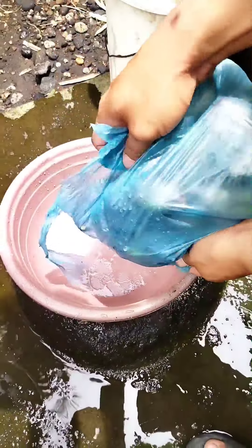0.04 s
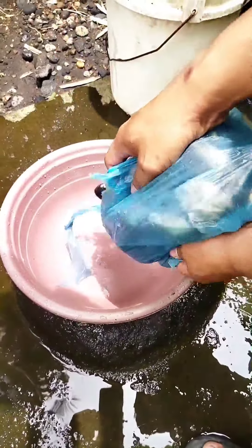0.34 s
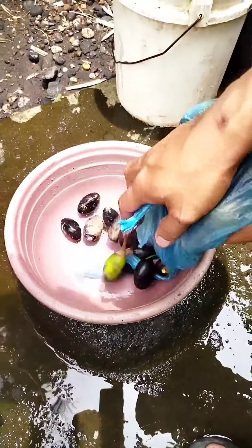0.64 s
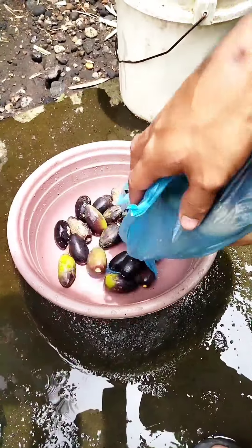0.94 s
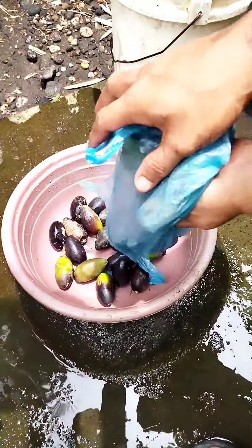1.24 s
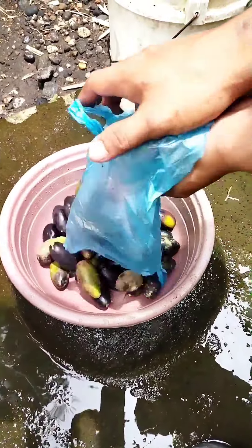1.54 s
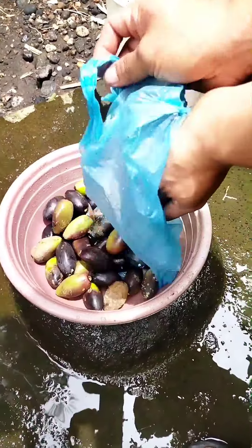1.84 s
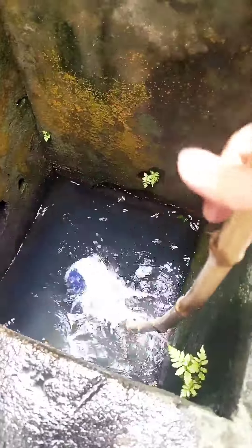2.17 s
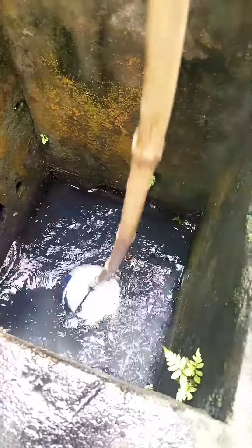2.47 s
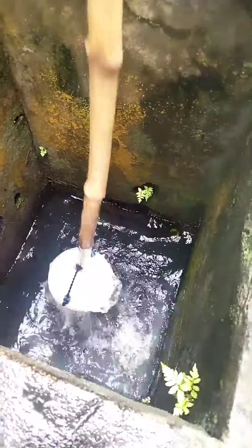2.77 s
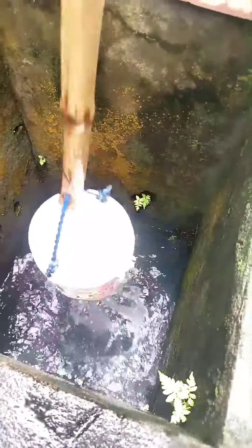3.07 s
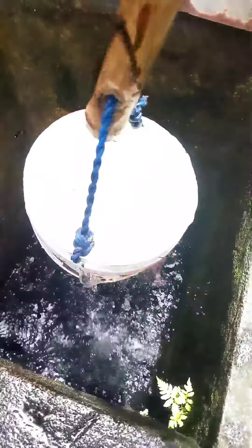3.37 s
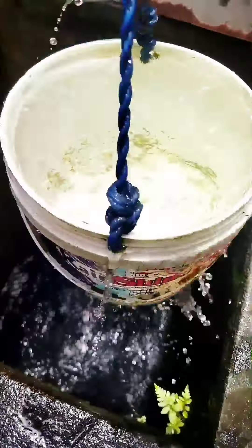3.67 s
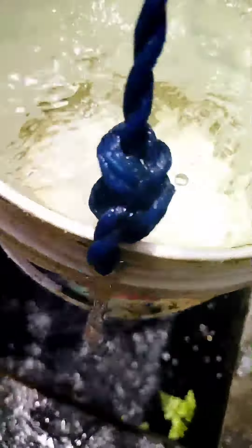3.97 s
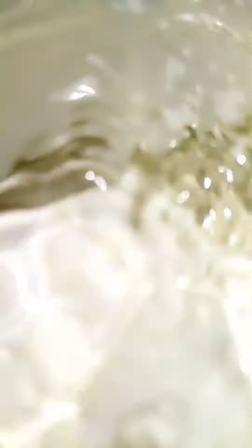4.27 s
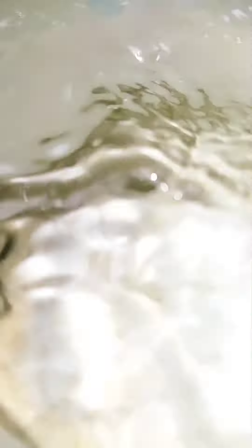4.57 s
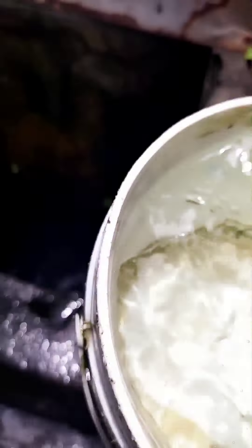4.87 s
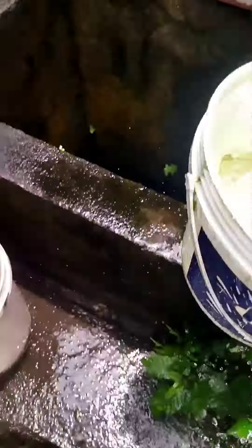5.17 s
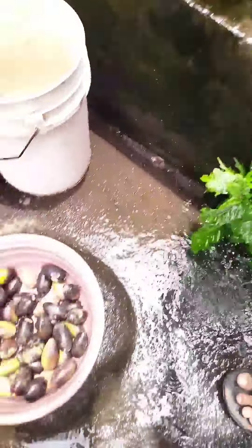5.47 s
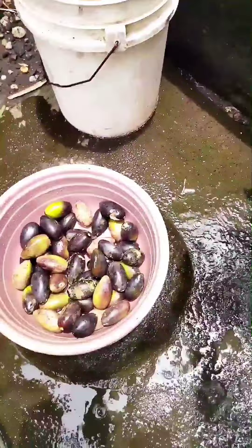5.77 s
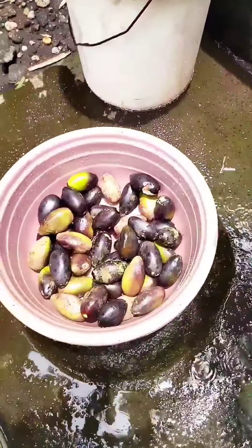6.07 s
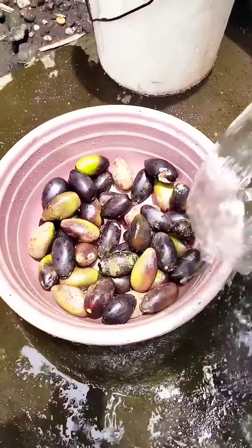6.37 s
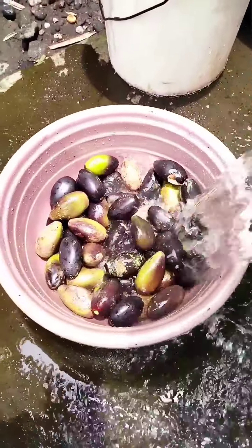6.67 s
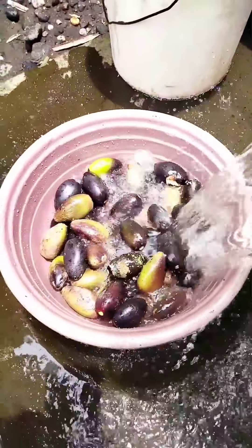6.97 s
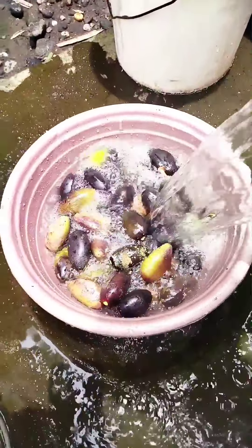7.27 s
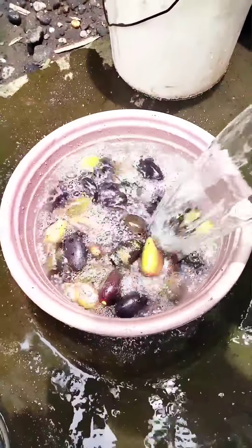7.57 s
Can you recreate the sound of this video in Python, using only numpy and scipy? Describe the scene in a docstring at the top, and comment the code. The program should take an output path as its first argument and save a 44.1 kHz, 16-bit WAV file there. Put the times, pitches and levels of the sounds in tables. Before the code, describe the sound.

A wet plastic bag crinkles as small hard fruits tumble into a hollow plastic basin in two rushes. A bucket knocks and dunks in a shallow well, then rises with water spilling and bubbling back into the shaft. Water sloshes, a wire handle clicks and sandals scuff on wet concrete. Two slops lead into a stream pouring on the fruit. Everything is close, over faint outdoor air and a low rumble.

```python
"""A wet plastic bag crinkles, and small hard fruits tumble from it in two rushes, ringing a plastic basin.
A bucket on a bamboo pole knocks, is dunked in a shallow well and rises, spilling bubbles and drops
back into the hollow shaft. It is carried over: the wire handle clicks, the water sloshes, sandals scuff
on wet concrete. Two slops, then a stream pours on the fruit. Yard air and a low rumble lie underneath."""
import sys
import numpy as np
from scipy import signal
from scipy.fft import rfft, irfft, next_fast_len
from scipy.io import wavfile
from scipy.ndimage import uniform_filter1d

SR = 44100
rng = np.random.default_rng(int(sys.argv[2]) if len(sys.argv) > 2 else 0)


def waveform_to_disk(signal):
    """Save audio, clipped to [-1, 1], as 16-bit WAV at the path in sys.argv[1]."""
    frames = np.transpose(np.atleast_2d(signal))
    scaled = np.clip(frames, -1, 1) * 32767
    samples = np.round(scaled).astype(np.int16)
    wavfile.write(sys.argv[1], SR, samples)


N = 335733

# Table levels are faders ahead of each layer's own gain.
# the bag sliding and crumpling: (time [s], level [dB])
BAG_ENVELOPE = [(0.0, -33), (0.026, -33.5), (0.262, -28.5), (0.29, -33), (0.394, -28), (0.504, -37),
                (0.58, -29), (0.91, -38), (0.938, -45), (1.086, -37), (1.108, -42.5), (1.54, -32),
                (1.92, -41), (1.97, -37.5)]
# tone of the crinkle: (frequency [Hz], level [dB])
BAG_TONE = [(100,-10),(250,2),(1400,1.5),(2000,3),(2450,-3.5),(3200,2.5),(5500,-2),(6700,1),(7500,-5),(9300,8),(10800,-1),(12000,4.5),(15500,5.5)]
# tone of the outdoor air: (frequency [Hz], level [dB])
AIR_TONE = [(25,-29),(70,0),(170,-7),(420,4),(800,-4),(1500,-3.5),(3500,-4.5),(7500,-8.5),(9500,-2),(11000,-11),(12500,1),(15500,-14)]
# slow drift of the low rumble: (time [s], level [dB])
RUMBLE_ENVELOPE = [(0,-41.5),(1.4,-49),(2.3,-48.5),(3.4,-45.5),(5,-49),(7.61,-46.5)]
# tone of the rumble: (frequency [Hz], level [dB])
RUMBLE_TONE = [(25,-81),(60,-6.5),(110,0),(170,0),(240,-1),(400,-23),(1500,-64)]
# featured fruit hits on the basin: (time [s], body [dB], crack [dB], thud [dB])
FRUIT_HITS = [(0.678,-4.5,-8.5,-9),(0.728,-6,-10.5,-13),(0.748,-3,-19,-15),(0.762,-5,-28,-16),(0.779,-8.5,-32,-28),(0.812,-4,-11.5,-26),(0.829,-4.5,-9,-24),(0.854,-4.5,-7,-20),(0.864,-8,-9,-28),(0.874,-6,-15,-28),
              (0.898,-8,-6.5,-25),(0.91,-4.5,-8,-23),(0.93,-4,-19,-27),(0.946,-7.5,-17,-24),(0.961,-13,-20.5,-32),(0.973,-3,-18,-25),(1.005,-4.5,-17,-22),(1.025,-2.5,-18,-20),(1.044,-2,-16,-23),
              (1.068,-4.5,-13,-24),(1.083,-13,-32,-29),(1.11,-13.5,-24,-36),(1.135,-12,-19,-31),(1.148,-6,-15.5,-25),(1.164,-13,-15.5,-31),(1.221,-13.5,-49,-38),(1.25,-18,-37,-38),(1.341,-20.5,-50,-38),(1.396,-16.5,-45,-33),(1.45,-15.5,-20.5,-28),
              (1.584,-10.5,-25,-27),(1.594,-4,-24,-27),(1.607,-3.5,-17,-26),(1.636,-4,-8.5,-23),(1.659,-3,-15,-26),(1.679,-6.5,-29,-21),(1.699,-14,-31,-25),(1.718,-12,-37,-28),(1.731,-3,-22,-25),(1.755,-3.5,-6.5,-16),(1.766,-8,-13,-22),(1.782,-5,-12.5,-20),
              (1.814,-3.5,-6,-21),(1.835,-11,-12,-21),(1.851,-16,-26,-24),(1.868,-7,-11.5,-26),(1.886,-9,-30,-30),(1.92,-10,-14,-31),(1.948,-23,-18.5,-36)]
# the two rushes, filled in with softer jostles: (start [s], end [s])
FRUIT_RUSHES = [(0.738, 1.12), (1.59, 1.9)]
# modes of the basin: (frequency [Hz], level when empty [dB], t60 [s], change when full [dB])
BASIN_MODES = [(209,-12,0.13,1),(258,-6.5,0.12,-0.5),(331,-6.5,0.11,1),(373.5,-4,0.1,2.5),(433.3,2,0.12,-2.5),(469,6,0.093,-3.5),(505,2,0.069,-1.5),(614,-1.5,0.059,0.5),(692,-5,0.11,2.5),(746,-6,0.12,-5),(804,-3,0.064,3.5),(882,2,0.038,0.5),(953,-11,0.056,4),(1290,-18,0.074,0),(1389,-5,0.057,-0.5),(1788,-8.5,0.057,4.5),(2150,-17,0.12,-5),(2660,-18,0.09,0)]
# air resonances of the basin's hollow: (frequency [Hz], gain [dB], t60 [s])
BASIN_AIR = [(261,-6,0.12),(467,-15,0.07),(596,-5,0.08)]
# tone of a hit's contact crack: (frequency [Hz], level [dB])
CRACK_TONE = [(500,8.5),(1000,13.5),(1400,14),(2500,7),(3500,3),(4500,-4),(5500,-13.5),(9000,-25),(16000,-14)]
# tone of a hit's low thud: (frequency [Hz], level [dB])
THUD_TONE = [(20,-28),(60,-9),(120,-8),(190,9.5),(260,1.5),(500,-52),(2000,-63)]
# bucket knocks, shorter when it is held: (time [s], body [dB], crack [dB], thud [dB], ring time [ratio])
BUCKET_KNOCKS = [(1.979,-29.5,-16,-11,0.35),(2.031,-15,-13.5,-16,0.47),(2.04,-19,-19,-17.5,0.62),(2.061,-25.5,-40,-38,1.1),(2.166,-32,-33,-35,0.47),(2.173,-19.5,-18.5,-24,1.35),(2.25,-19.5,-15,-20,0.72),(4.304,-30,-28,-30,0.34),
                 (4.493,-18.5,-11.5,-18,0.13),(4.511,-18,-33,-28,0.22),(4.6,-38,-42,-34,0.4),(4.652,-28,-33,-30,0.26)]
# modes of the full bucket: (frequency [Hz], level [dB], t60 [s])
BUCKET_MODES = [(232,-8,0.033),(269,6.5,0.17),(351,8,0.19),(392,10.5,0.06),(560,-4,0.012),(589,15,0.075),(830,-5,0.036),(1070,-6,0.016)]
# featured bubbles and air pockets: (time [s], level [dB], pitch [Hz], t60 [cycles])
AIR_POCKETS = [(1.979,-13,145,4.7),(2.031,-13,200,12),(2.06,-27,268,59),(2.17,-8.5,392,22),(2.6,-27,3560,190),(2.607,-28,4580,260),(2.64,-28,956,50),(2.705,-29,2030,150),(2.767,-20,894,120),(2.767,-15,1600,45),(2.767,-19,1900,70),(2.905,-24,2360,74),(2.933,-26,2750,100),
               (3.068,-25,900,61),(3.15,-21,1270,61),(3.218,-19.5,1570,150),(3.241,-13.5,336,51),(3.425,-24,335,66),(3.477,-20,279,31),(3.569,-21.5,225,25),(3.602,-23,2800,98),(4.075,-24.5,352,24),(4.255,-25,2862,110),(4.41,-25.5,1776,54),
               (4.5,-20,237,12),(4.511,-16.5,583,12),(4.597,-33.5,405,11),(4.651,-30,523,8.7),(4.71,-32,1120,40),(4.748,-38,1260,45),(4.786,-33.5,596,20),(6.40,-26.5,578,14),(6.508,-16.5,2220,36),(6.57,-25,1530,89),(6.68,-22,432,13),(6.77,-20,541,26),(7.407,-25,990,84),(7.512,-29,2020,99)]
# featured water slaps: (time [s], body [dB], centre [Hz], treble [dB], t60 [s])
WATER_SLAPS = [(1.983,-18,1580,-22.5,0.067),(2.172,-24,1390,-34,0.12),(2.221,-24,2600,-24,0.06),(2.35,-35.5,4050,-30.5,0.28),(2.501,-28.5,1970,-37,0.058),(2.765,-15.5,1330,-46,0.043),(2.845,-18,796,-51,0.039),(2.902,-31,2090,-50,0.083),
               (3.068,-18,1050,-30,0.1),(3.223,-25,1600,-37,0.15),(3.475,-20,1220,-42,0.14),(3.566,-31,900,-38,0.1),(3.755,-40,3000,-31.5,0.09),(3.812,-49,2500,-29,0.088),(3.9005,-26.5,2700,-19.5,0.012),(3.914,-26.5,1980,-25,0.096),(3.95,-25,1710,-24,0.39),(4.05,-23,1520,-29,0.065),(4.145,-34,1210,-26,0.009),(4.225,-37,1900,-29.5,0.17),(4.254,-25,2440,-36,0.05),(4.305,-44,1600,-33,0.083),(4.408,-27,1850,-31.5,0.049),
               (4.655,-34.5,1580,-34,0.12),(4.71,-34,1700,-35,0.04),(4.871,-34,1610,-35.5,0.04),(6.448,-44,4400,-20.5,0.0054),(6.5075,-16.5,3150,-16.5,0.0064),(6.5605,-26,4300,-17.5,0.0033),(6.568,-17.5,1580,-22,0.018),
               (6.62,-25,2980,-26,0.059),(6.859,-18,3400,-32,0.011),(7.029,-17.5,4500,-31,0.018),(7.133,-23,3900,-32,0.012),(7.33,-24,2400,-34,0.02)]
# the bucket pushed under twice: (start [s], length [s], level [dB])
BUCKET_DUNKS = [(1.991,.05,-27),(2.221,0.055,-26)]
# water spilling off the bucket into the well: (time [s], level [dB])
SPILL_ENVELOPE = [(2.42,-52),(2.5,-32.5),(2.63,-32),(2.69,-33),(2.8,-29),(3.0,-24),(3.2,-24),(3.56,-22),(3.63,-30),(3.73,-36),(4.12,-33),(4.32,-32.5),(4.45,-36),(4.57,-44),(4.71,-40.5),(5.08,-55.5)]
# tone of the spill and the slosh: (frequency [Hz], level [dB])
SPILL_TONE = [(120,-17.5),(330,-5),(470,-6.5),(600,-2),(950,2),(1600,-1.5),(2600,-1),(4500,1),(5200,-4.5),(6700,-2),(7500,-9.5),(9200,4),(11000,-8),(11900,0.5),(15500,-1)]
# the spray comes forward as the bucket rises to the rim: (time [s], spray boost [dB])
LIFT_SPRAY = [(3.2,-4),(3.8,3)]
# air resonances of the well shaft: (frequency [Hz], gain [dB], t60 [s])
SHAFT_AIR = [(176.7,12,0.23),(266,2,0.14),(344,4,0.24),(610,-7,0.028),(880,-9,0.14)]
# clicks of the wire handle: (time [s], clack [dB], bright tick [dB])
HANDLE_CLICKS = [(4.494,-16,-23),(5.14,-27,-24.5),(5.194,-44,-35),(5.477,-46,-31),(5.596,-44,-37),(5.617,-44,-37),(5.631,-49,-30),(5.65,-56,-26.5),(5.698,-44,-30),(5.787,-32,-19),(5.805,-21,-42),(5.812,-12.5,-23),(5.8453,-28,-18.5),(5.857,-43,-23.5),(5.93,-17,-18),(6.017,-27.5,-35),(6.248,-44,-26),(6.268,-35,-28.5),(6.395,-28.5,-38)]
# sandals dragged on wet concrete: (start [s], length [s], level [dB], tilt [dB/octave])
SANDAL_SCUFFS = [(5.141,0.064,-31.5,3.5),(5.247,0.061,-36.5,0.5),(5.484,0.037,-38.5,1),(5.581,0.055,-41.5,0),(5.692,0.031,-26,9),(5.868,0.045,-32,6),(6.067,0.135,-26.5,0.86)]
# tone of a scuff before its tilt: (frequency [Hz], level [dB])
SCUFF_TONE = [(200,-8),(800,-5),(1500,-2),(1920,1.5),(2250,-4),(4100,-4.5),(4800,-12),(5250,-7.5),(7400,-15),(9200,-8.5),(11000,-18),(12200,-9.5),(15500,-13)]
# slops over the rim, ahead of the stream: (start [s], length [s], spray [dB])
RIM_SLOPS = [(6.457,.045,-20),(6.571,0.12,-21)]
# tone of water landing on the fruit: (frequency [Hz], level [dB])
POUR_TONE = [(150,-14),(350,-11),(600,-1),(800,-0.5),(1200,-4.5),(2400,3),(3400,5),(4600,1.5),(5100,1),(6700,3),(7400,-3.5),(9200,8.5),(11000,-3),(11900,4.5),(15500,3.5)]
# reverb of the concrete walls: (frequency [Hz], t60 [s])
WALL_DECAY = [(150,0.23),(600,0.13),(3000,0.24),(15000,0.0073)]
# drift across the stereo image: (time [s], left minus right [dB])
PAN_DRIFT = [(0,1),(.7,-1),(3.7,0.5),(4.8,-2.5),(7.61,0)]
# imbalance of the two microphones: (frequency [Hz], left minus right [dB])
MIC_BALANCE = [(100,0.23),(380,2.6),(800,0.14),(2400,2),(4400,3.2),(7000,3.5),(8200,7.5),(9200,19),(10200,9.8),(11200,1.3),(15000,3.7)]
# how alike diffuse sound is on both sides: (frequency [Hz], correlation [ratio])
MIC_COHERENCE = [(60,0.98),(300,0.85),(700,0.81),(1400,0.15),(3000,0.21),(15000,0.02)]
# bright edge of a slap or click: (frequency [Hz], level [dB])
EDGE_TONE = [(2000, -46), (4500, 6.5), (7500, 2.5), (9300, 10), (11000, 2.5), (12500, 12.5),
             (14000, 6.5), (15500, 7.5)]


def amp(db):
    """Decibels to gain."""
    return 10 ** (np.asarray(db) / 20)


def decay(t, t60):
    """An exponential fade, 60 dB down at t60."""
    return np.exp(-np.log(1000) * t / t60)


def unit_rms(x):
    """Scales to rms 1."""
    return x / np.sqrt(np.mean(x ** 2) + 1e-20)


def unit_hit(x):
    """Scales a hit so that its loudest 5 ms have rms 1 in mono."""
    return x / np.sqrt(uniform_filter1d(x.mean(0) ** 2, 220).max() + 1e-20)


def at_hz(points, hz):
    """Reads a curve on a log-frequency axis."""
    knots, values = np.transpose(points)
    return np.interp(np.log(hz + 1), np.log(knots + 1), values)


def bins(x):
    """Frequencies of the spectrum of x."""
    return np.fft.rfftfreq(x.shape[-1], 1 / SR)


def eq(x, tone):
    """Filters by a tone curve."""
    return irfft(rfft(x) * amp(at_hz(tone, bins(x))), x.shape[-1])


def add(mix, s, sound):
    """Mixes a stereo sound in at a time."""
    part = mix[:, max(round(s * SR), 0):][:, :sound.shape[1]]
    part += sound[:, :part.shape[1]]


def envelopes(rows):
    """Start time and one gain curve per level column, with softened ends."""
    s, *columns = np.transpose(rows)
    t = s[0] + np.arange(next_fast_len(int((s[-1] - s[0]) * SR))) / SR
    ends = np.clip(np.minimum(t - s[0], s[-1] + .01 - t) / .005, 0, 1)
    return s[0], [amp(np.interp(t, s, db)) * ends for db in columns]


def stroke(start, length, db, attack_s, swell_db, release_s):
    """One gesture as (time [s], level [dB]): it sets in, swells or sinks, and lets go."""
    end = start + length
    return [(start - attack_s, db - 30), (start, db - swell_db), (end, db), (end + release_s, db - 30)]


def wander(size, span_s):
    """A smooth random curve of rms 1 that changes over about this time."""
    width = int(span_s * SR)
    return unit_rms(uniform_filter1d(uniform_filter1d(rng.standard_normal(size), width), width // 2))


def noise(size):
    """Stereo white noise, centred in the bass and wide on top."""
    white = rng.standard_normal((2, size))
    mid, side = rfft(white)
    same = np.clip(at_hz(MIC_COHERENCE, bins(white)), -1, 1)
    mid, side = mid * np.sqrt(1 + same), side * np.sqrt(1 - same)
    return unit_rms(irfft([mid + side, mid - side], size))


def grains(size, per_s, cycles, spread_db, low_hz, high_hz, count):
    """A cloud of tiny damped rings; the small high ones come most often."""
    pitches, out = np.geomspace(low_hz, high_hz, count), np.zeros((2, size))
    for hz in pitches * rng.uniform(.95, 1.05, count):
        life = cycles / hz
        lag = rng.uniform(0, 0.0005, (2, 1))  # path to each microphone
        t = np.maximum(np.arange(int(life * SR) + 40) / SR - lag, 0)
        ring = np.sin(2 * np.pi * hz * t) * decay(t, life)
        born = rng.random(size) < per_s * hz / pitches.sum() / SR
        sizes = amp(spread_db * np.minimum(rng.exponential(1, size), 4))
        out += signal.oaconvolve((born * sizes)[None], ring / np.linalg.norm(ring), axes=1)[:, :size]
    return unit_rms(out)


def friction(rows, tone, level_db, slips_per_s, spread_db, hiss_db):
    """Dense tiny slips merge into a grainy hiss that follows the gesture."""
    s, (gesture,) = envelopes(rows)
    size, out = len(gesture), np.zeros((2, N))
    slips = grains(size, slips_per_s, cycles=2.4, spread_db=spread_db, low_hz=950, high_hz=14800, count=12)
    texture = unit_rms(eq(slips + amp(hiss_db) * noise(size), tone))
    add(out, s, amp(level_db) * gesture * texture)
    return out


def plastic_bag(flutter_db=1.4):
    """Wet film slides and crumples in tiny slips, with a quick flutter in level."""
    crinkle = friction(BAG_ENVELOPE, BAG_TONE, level_db=7.5, slips_per_s=5000, spread_db=4, hiss_db=-4)
    return crinkle * amp(flutter_db * wander(N, span_s=0.014))


def yard(air_db=-42):
    """The bed: steady outdoor air and a low hollow rumble."""
    size = next_fast_len(N)
    air, rumble = (unit_rms(eq(noise(size), tone))[:, :N] for tone in (AIR_TONE, RUMBLE_TONE))
    rumble_db = np.interp(np.arange(N) / SR, *np.transpose(RUMBLE_ENVELOPE))
    return amp(air_db) * air + amp(rumble_db) * rumble


def burst(tone, rise_s, t60, tick=0, size=12000):
    """A puff of shaped noise, quick to swell and die; a hard contact adds one tick."""
    t, drive = np.arange(size) / SR, noise(size)
    drive[:, 60] += tick
    return unit_hit(eq(drive, tone) * (1 - np.exp(-t / rise_s)) * decay(t, t60))


def plastic_hits(rows, modes_at, body_db, crack_db, thud_db, thud_t60, crack_t60=0.075):
    """Each hit rings a plastic wall, with a crack and a thud; its ring ratio scales all three decays."""
    out, t = np.zeros((2, N)), np.arange(7200) / SR
    contact_s, spot_db, detune_spread = 0.0018, 2.8, 0.052
    attack = 1 - np.exp(-t / contact_s)
    for s, body, crack, thud, ring_ratio in rows:
        hz, db, t60 = np.transpose(modes_at(s))[:, :, None]
        # the landing spot weights the modes and the shifting load detunes them
        spot, detune, turn, lag = rng.standard_normal((4, len(hz), 1))
        phase = 2 * np.pi * hz * (1 + detune_spread * detune) * t + turn
        strength = amp(db + spot_db * spot) * decay(t, ring_ratio * t60) * attack
        ring = np.array([(strength * np.sin(phase + side * lag * hz / 2500)).sum(0) for side in (-1, 1)])
        add(out, s, amp(body + body_db) * unit_hit(ring))
        add(out, s, amp(crack + crack_db) * burst(CRACK_TONE, 0.000093, ring_ratio * crack_t60, tick=2.4))
        add(out, s, amp(thud + thud_db) * burst(THUD_TONE, 0.0049, ring_ratio * thud_t60))
    return out


def landings(per_rush=6, spread_db=3.5):
    """The featured fruit hits, plus soft jostles scattered through each rush."""
    jostles = []
    for start, end in FRUIT_RUSHES:
        place, force_db = rng.random(per_rush), spread_db * rng.standard_normal(per_rush)
        s = start + (end - start) * (np.arange(per_rush) + place) / per_rush
        jostles.append(np.column_stack([s, force_db - 13, force_db - 22, force_db - 33]))
    return np.vstack([FRUIT_HITS, *jostles])


def rebounds(rows, loss_db=8):
    """Each fruit settles with a second, softer and duller bump."""
    s, body, crack, thud = np.transpose(rows)
    hop_s = rng.uniform(0.00597, .02, len(s))
    return np.column_stack([s + hop_s, body - loss_db, crack - 2 * loss_db, thud - loss_db])


def basin_modes(s, full_s=2, full_ring=0.86):
    """The growing pile damps the basin's floor, so its walls are heard more."""
    load = np.interp(s, [FRUIT_HITS[0][0], full_s], [0, 1])
    return [(hz, db + load * full_db, t60 * full_ring ** load) for hz, db, t60, full_db in BASIN_MODES]


def hollow(x, resonances):
    """An enclosed body of air adds its resonances to the sound inside it."""
    t = np.arange(16384) / SR
    hz, db, t60 = np.transpose(resonances)[:, :, None]
    fade = decay(t, t60)
    ring = (2 * amp(db) * fade / fade.sum(1, keepdims=True) * np.cos(2 * np.pi * hz * t)).sum(0)
    return x + signal.oaconvolve(x, ring[None], axes=1)[:, :N]


def tumbling_fruit(ring_ratio=0.79):
    """Fruits land and bounce in the hollow basin, each one shortening the ring it starts."""
    falls = landings()
    bumps = [(*row, ring_ratio) for row in np.vstack([falls, rebounds(falls)])]
    hits = plastic_hits(bumps, basin_modes, body_db=-2, crack_db=-2.5, thud_db=-5, thud_t60=0.04)
    return hollow(hits, BASIN_AIR)


def bucket_knocks():
    """Knocks ring the low modes of the full bucket."""
    return plastic_hits(BUCKET_KNOCKS, lambda s: BUCKET_MODES,
                        body_db=1, crack_db=0.5, thud_db=0.5, thud_t60=0.1)


def gulps(rise_s=0.0049, glide=0.32):
    """Single pockets of trapped air ring out and climb a little in pitch."""
    out, t = np.zeros((2, N)), np.arange(8192) / SR
    attack = 1 - np.exp(-t / rise_s)
    for s, db, hz, cycles in AIR_POCKETS:
        ring = np.sin(2 * np.pi * hz * t * (1 + glide * t)) * attack * decay(t, cycles / hz)
        add(out, s, amp(db) * unit_hit(np.array([ring, ring])))
    return out


def snaps(rows, body_db, treble_db, rise_s, tick, tail_t60, tail_db=-16):
    """Ringless impacts: a hump of noise and a bright edge, each with a scattered tail."""
    out = np.zeros((2, N))
    for s, db, hz, treble, t60 in rows:
        hump = [(hz / 6, -28), (hz / 2, -7), (hz, 0), (hz * 2, -8), (hz * 5, -30)]
        for tone, level in ((hump, db + body_db), (EDGE_TONE, treble + treble_db)):
            hit = burst(tone, rise_s + 0.018 * t60, t60, tick)  # long ones swell more slowly
            tail = amp(tail_db) * burst(tone, 0.0052, tail_t60)
            add(out, s, amp(level) * (hit + tail))
    return out


def splashes():
    """Water slaps sharply and trails off in a long fizz."""
    return snaps(WATER_SLAPS, body_db=4, treble_db=6, rise_s=0.00048, tick=7.6, tail_t60=0.61)


def bubbles(size, per_s, spread_db, high_hz, low_hz=340, glide=0.028, cycles=40):
    """Every bubble has its own pitch, life and place, and climbs as it nears the surface."""
    out = np.zeros((2, size))
    for when, pitch, rank, damping, place in rng.random((int(per_s * size / SR), 5)):
        hz = low_hz + pitch * (high_hz - low_hz)
        life = cycles * (.5 + damping) / hz
        lag = np.array([[place], [1 - place]]) / 2000
        t = np.maximum(np.arange(int(life * SR)) / SR - lag, 0)
        ring = np.sin(2 * np.pi * hz * t * (1 + glide * t / life)) * decay(t, life)
        gain = amp(spread_db * min(-np.log(rank), 4)) / np.sqrt(life)
        add(out, when * size / SR, gain * ring)
    return unit_rms(out)


def water(rows, tone, bubbling_db, spray_db, drops_per_s, wash_db, churn_db,
          bubbles_per_s=480, top_hz=2400, spread_db=3, crossover_hz=1960):
    """Bubbles, drops and clear plinks over a wash, riding rows of (time [s], bubbling [dB], spray [dB])."""
    s, (bubbling, spray) = envelopes(rows)
    size, out = len(spray), np.zeros((2, N))
    rings = bubbles(size, bubbles_per_s, spread_db, top_hz)
    drops = grains(size, drops_per_s, cycles=2.9, spread_db=spread_db, low_hz=635, high_hz=14060, count=18)
    plinks = bubbles(size, 130, spread_db, high_hz=4630, low_hz=1293, glide=0.07, cycles=80)
    texture = eq(rings + drops + amp(-9.5) * plinks + amp(wash_db) * noise(size), tone)
    low = irfft(rfft(texture) / (1 + (bins(texture) / crossover_hz) ** 8), size)
    high = texture - low
    # the water arrives in lumps: a fast churn on a slower surge
    lumps = amp(churn_db * wander(size, 0.041) + 1.1 * wander(size, 0.099))
    add(out, s, amp(bubbling_db) * bubbling * unit_rms(low * lumps))
    add(out, s, amp(spray_db) * spray * unit_rms(high * np.sqrt(lumps)))
    return out


def well():
    """Two dunks churn the shaft, then the spill falls back; the higher the bucket, the more spray."""
    out = np.zeros((2, N))
    dunks = [stroke(*dunk, attack_s=0.042, swell_db=-6.5, release_s=0.22) for dunk in BUCKET_DUNKS]
    for flow in dunks + [SPILL_ENVELOPE]:
        s, db = np.transpose(flow)
        rows = np.column_stack([s, db, db + np.interp(s, *np.transpose(LIFT_SPRAY))])
        out += water(rows, SPILL_TONE, bubbling_db=1.5, spray_db=3.5, drops_per_s=1500,
                     wash_db=0.5, churn_db=1)
    return hollow(out, SHAFT_AIR)


def wire_handle(centre_hz=3280, t60=0.0063):
    """The wire handle clicks on the bucket, short and bright."""
    clicks = [(s, clack, centre_hz, tick, t60) for s, clack, tick in HANDLE_CLICKS]
    return snaps(clicks, body_db=-4.5, treble_db=4.5, rise_s=0.0005, tick=5, tail_t60=0.12)


def sloshing():
    """After the last knock a wave runs back across the bucket and laps at its wall."""
    wave = stroke(start=4.665, length=0.16, db=-36, attack_s=0.02, swell_db=-5, release_s=0.3)
    rows = [(s, db, db - 3) for s, db in wave]
    return water(rows, SPILL_TONE, bubbling_db=-3.5, spray_db=2.5, drops_per_s=900, wash_db=0, churn_db=2.5)


def sandals(grit_db=2.2):
    """Each scuff is one short drag that catches unevenly on the grit."""
    out = np.zeros((2, N))
    for start, length, db, tilt in SANDAL_SCUFFS:
        tone = [(hz, level + tilt * np.log2(hz)) for hz, level in SCUFF_TONE]
        drag = stroke(start, length, db, attack_s=.55 * length, swell_db=2.5, release_s=0.047)
        out += friction(drag, tone, level_db=4, slips_per_s=6800, spread_db=23, hiss_db=7)
    return out * amp(grit_db * wander(N, span_s=0.01))


def pouring(stream_s=6.615, drumming_s=0.11, hold_s=0.57, sag_db_per_s=11, tip_s=7.26, tip_width_s=0.076):
    """Two slops, then a stream that drums on the fruit, holds, and thins as the bucket empties."""
    age = np.linspace(0, N / SR - stream_s, num=50)
    drumming = (age / drumming_s * np.exp(1 - age / drumming_s)) ** 2  # peaks while the water is shallow
    bubbling_db = -27 + 5.5 * drumming
    spray_db = -20.5 - sag_db_per_s * np.maximum(age - hold_s, 0)
    tip_db = 2.5 * np.exp(-((stream_s + age - tip_s) / tip_width_s) ** 2)  # the bucket tips further
    stream = np.column_stack([stream_s + age, bubbling_db + tip_db / 2, spray_db + tip_db])
    gestures = [stroke(*slop, attack_s=.025, swell_db=5, release_s=0.071) for slop in RIM_SLOPS]
    slops = [[(s, db - 17.5, db) for s, db in gesture] for gesture in gestures]  # mostly spray
    return sum(water(rows, POUR_TONE, bubbling_db=2, spray_db=2, drops_per_s=2200, wash_db=1.5,
                     churn_db=0.9, bubbles_per_s=1000, top_hz=5000, spread_db=2.8)
               for rows in slops + [stream])


def early_echoes(x, gain=0.69, spread_s=.005, drift=0.154, count=5):
    """Wet surfaces within arm's reach throw the treble back, along paths that shift as things move."""
    t, out = np.arange(N) / SR, x.copy()
    treble = signal.sosfilt(signal.butter(1, 2500, "high", fs=SR, output="sos"), x)
    for channel, sound in zip(out, treble):
        for path, pace, turn, sign in rng.random((count, 4)):
            sway = 1 + drift * np.sin(2 * np.pi * ((.5 + pace) * t + turn))
            delay = (0.0007634 + path * spread_s) * sway
            channel += np.sign(sign - .5) * gain * np.interp(t - delay, t, sound)
    return out / np.sqrt(1 + count * gain ** 2 / 2)


def wall_reverb(x, rise_s=0.0042):
    """Concrete close by returns a short diffuse tail."""
    hz, t, spectrum = signal.stft(noise(16384), SR, nperseg=256)
    fade = decay(t, at_hz(WALL_DECAY, hz)[:, None]) * (1 - np.exp(-t / rise_s))
    tail = signal.istft(spectrum * fade, SR, nperseg=256)[1]
    return signal.oaconvolve(x, tail / np.linalg.norm(tail[0]), axes=1)[:, :N]


def scene():
    """The mix: a yard bus and a more reverberant well bus over the bed, drifting gently in pan."""
    fruit, knocks, bag = tumbling_fruit(), bucket_knocks(), plastic_bag()
    slaps, handle = splashes(), wire_handle()
    yard_bus = early_echoes(bag + fruit)
    yard_bus += early_echoes(handle + sandals())
    yard_bus += early_echoes(pouring() + sloshing())
    well_bus = early_echoes(knocks + gulps() + slaps + well())
    reverb = wall_reverb(amp(-17) * yard_bus + amp(-13) * well_bus)
    pan_db = np.interp(np.arange(N) / SR, *np.transpose(PAN_DRIFT)) * np.array([[.5], [-.5]])
    return amp(pan_db) * (yard_bus + well_bus + reverb + yard())


def record(dry, ceiling=.95, low_cut_hz=55, high_cut_hz=15600):
    """Two unequal microphones, a soft ceiling on the peaks, a low cut and a steep high cut."""
    ratio = amp(at_hz(MIC_BALANCE, bins(dry)))
    mic_gains = np.array([ratio, np.ones_like(ratio)]) * np.sqrt(2 / (1 + ratio ** 2))
    heard = irfft(rfft(dry) * mic_gains, N)
    limited = heard / (1 + (heard / ceiling) ** 6) ** (1 / 6)
    thinned = signal.sosfilt(signal.butter(1, low_cut_hz, "high", fs=SR, output="sos"), limited)
    high_cut = signal.firwin(511, high_cut_hz, window=("kaiser", 9), fs=SR)
    return signal.oaconvolve(thinned, high_cut[None], "same")


dry = scene()
out = record(dry)
waveform_to_disk(out)
```